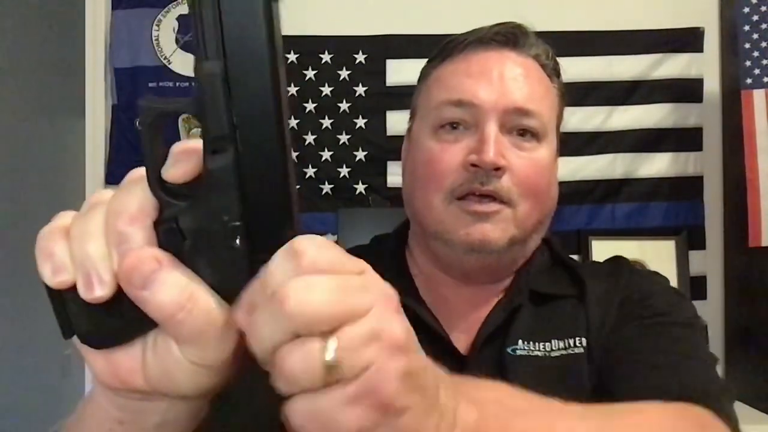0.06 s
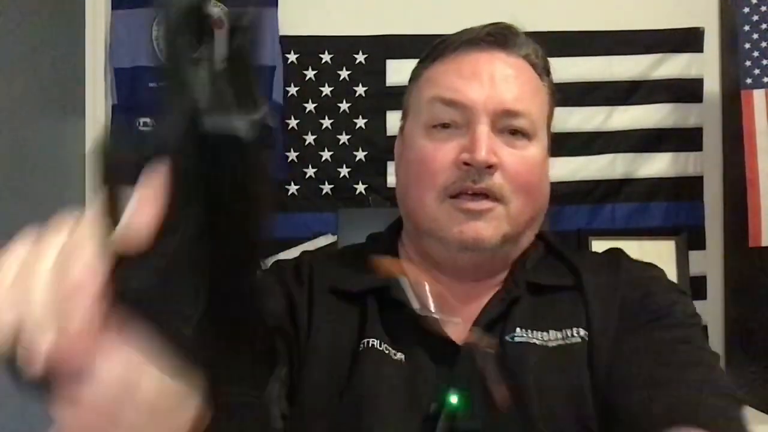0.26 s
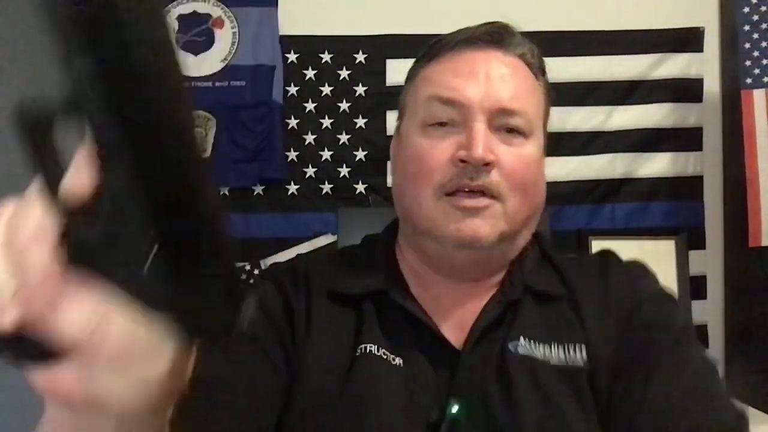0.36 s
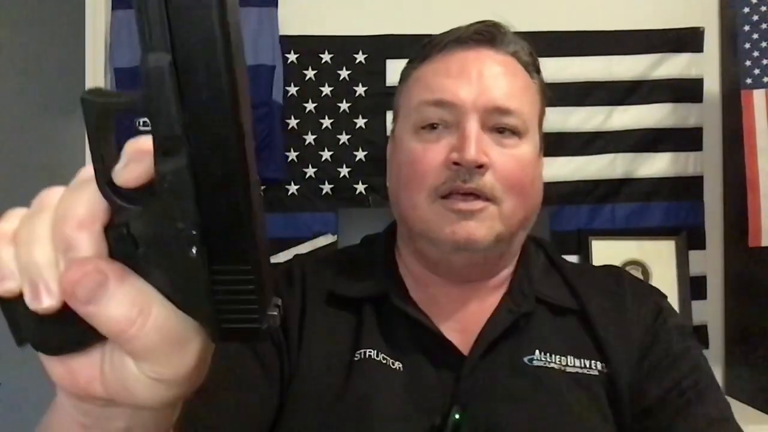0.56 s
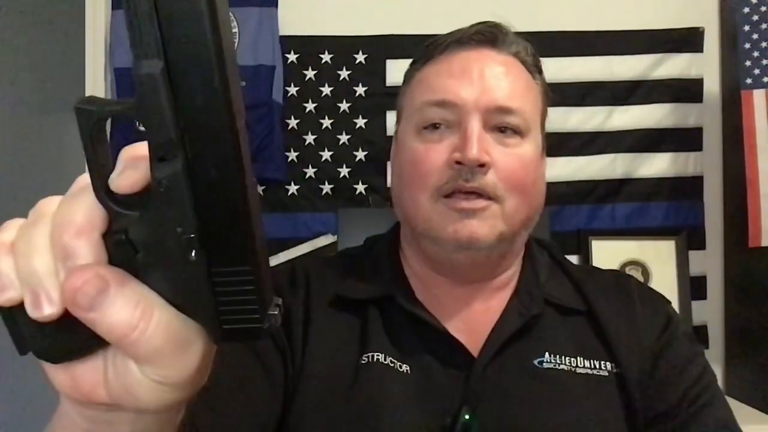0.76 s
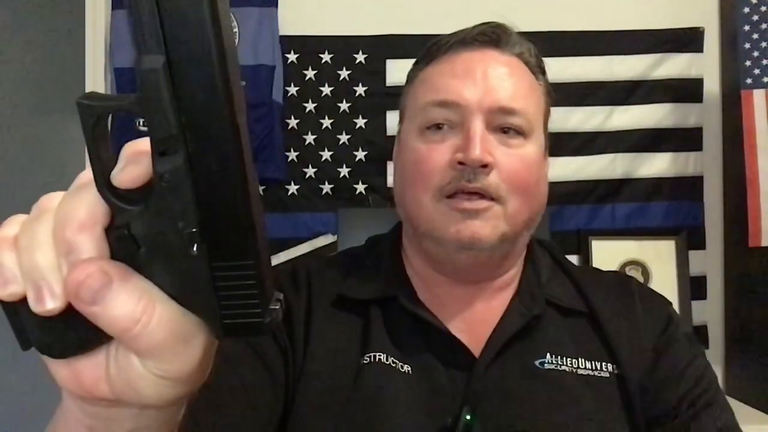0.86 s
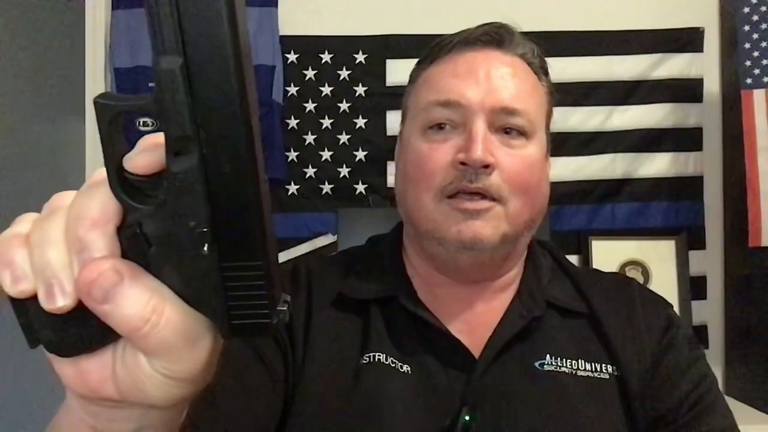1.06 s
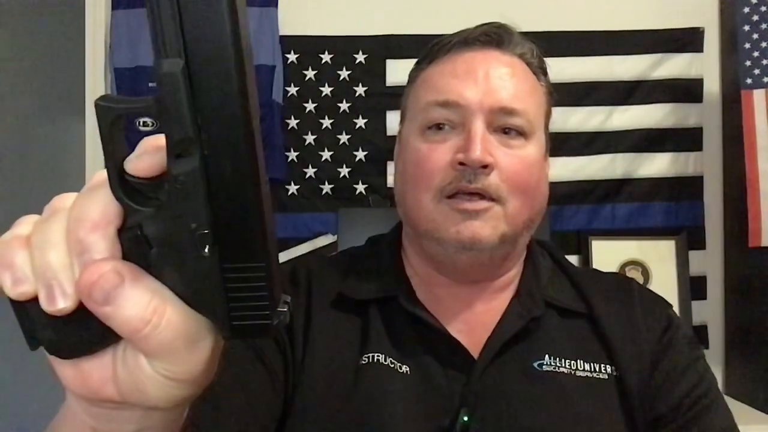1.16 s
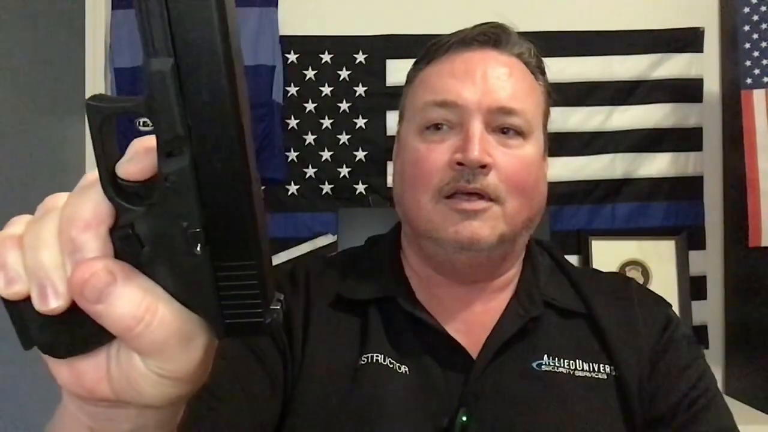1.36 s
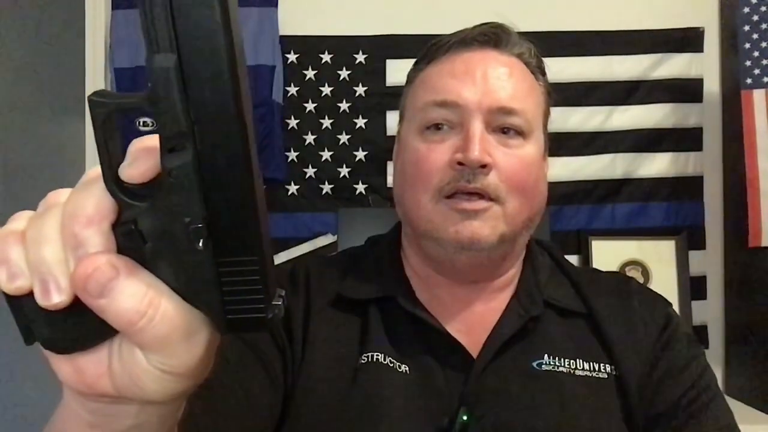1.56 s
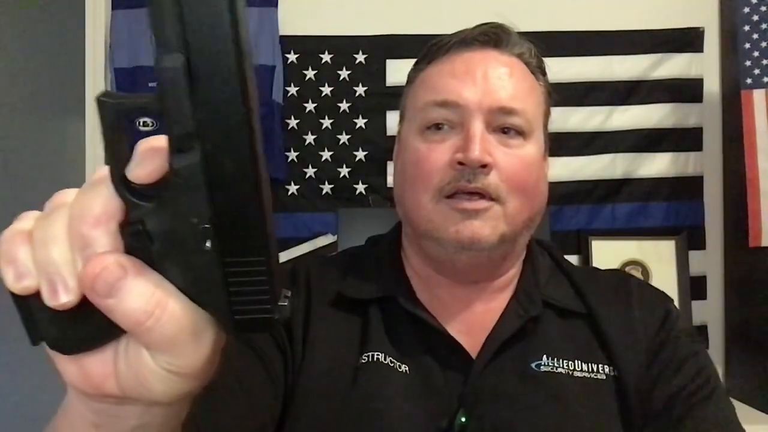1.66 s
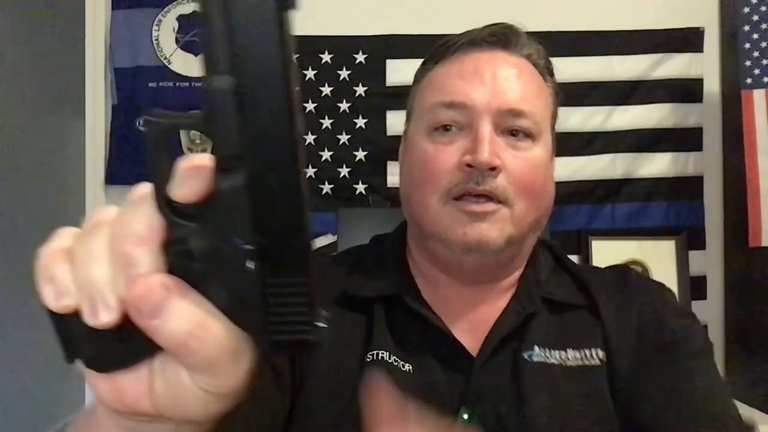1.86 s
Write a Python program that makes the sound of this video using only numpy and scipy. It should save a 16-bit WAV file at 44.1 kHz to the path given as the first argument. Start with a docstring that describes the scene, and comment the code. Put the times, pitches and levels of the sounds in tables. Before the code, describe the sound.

Loud, bright metal clacks of a handgun slide pulled back and released, a soft thud farther off, a dry little tick, then one hard snap with a quick bounce, close and slightly clipped, with short indoor reverberation.

```python
"""Quiet room air comes first; then, close by, a pistol slide chatters back, hits its stop and slams shut.
The ejected dummy round lands with a dull thud; a small catch ticks, then the action snaps and bounces.
Contacts are decaying noise bursts through spectral filters; metal parts add sums of damped sine modes.
The hardest blows add low thumps of falling pitch. A noise-built room response adds reverberation;
the recorder limits the loud blows, rounds their peaks and cuts the top."""
import sys
import numpy as np
from scipy import signal
from scipy.fft import rfft, irfft, next_fast_len
from scipy.io import wavfile
from scipy.ndimage import uniform_filter1d, minimum_filter1d

SR = 44100
rng = np.random.default_rng(int(sys.argv[2]) if len(sys.argv) > 2 else 0)


def store_wav(level_fs):
    """Save 16-bit WAV to argv[1]."""
    pcm = np.round(np.clip(np.atleast_2d(level_fs), -1, 1) * 32767)
    wavfile.write(sys.argv[1], SR, pcm.T.astype(np.int16))


N = 83790  # length [samples]


def undb(db):
    """Amplitude gain is ten to the power of the decibels over twenty."""
    return 10 ** (np.asarray(db) / 20)


def curve(points, hz):
    """Linear interpolation of a table along a logarithmic frequency axis."""
    p = np.array(points, float)
    return np.interp(np.log(hz + 0.0011), np.log(p[:, 0]), p[:, 1])


def fade(t, t60):
    """Exponential decay: the amplitude has fallen by 60 dB after t60 seconds."""
    return np.exp(-np.log(1000) * t / max(t60, 1e-4))


def colour(x, points):
    """Minimum-phase filtering: folding the cepstrum makes a causal filter of unit mean power gain."""
    size = 2 * next_fast_len(N)
    hz = np.arange(size // 2 + 1) * SR / size
    gain = undb(curve(points, hz))
    gain = gain / np.sqrt(np.mean(gain ** 2))
    cepstrum = irfft(np.log(gain))
    # Fold the negative-time half onto the positive-time half.
    cepstrum[1:size // 2] *= 2
    cepstrum[size // 2 + 1:] = 0
    response = np.exp(rfft(cepstrum))
    return irfft(rfft(x, size) * response)[:N]


def add(out, start, sound):
    """Superposition: a sound is summed into the signal from its start time [s]."""
    i = int(max(start, 0) * SR)
    out[i:] += sound[:N - i]


def cracks(hits, points):
    """Contact noise: many tiny collisions act as a decaying random burst with a coloured spectrum."""
    t, out = np.arange(N) / SR, np.zeros(N)
    for start, db, t60 in hits:
        burst = fade(t, t60) * rng.standard_normal(N)
        add(out, start, undb(db) * burst)
    return colour(out, points)


def rings(hits, modes, ring_db):
    """Modal superposition: each contact excites the same damped modes, with fresh random phases."""
    t, out = np.arange(N) / SR, np.zeros(N)
    waves = np.array([undb(db) * fade(t, t60) * np.exp(2j * np.pi * hz * t) for hz, db, t60 in modes])
    for start, db, _ in hits:
        phases = np.exp(2j * np.pi * rng.random(len(modes)))
        add(out, start, undb(db + ring_db) * (phases @ waves).imag)
    # The first mode is the lowest; remove what lies far below it.
    highpass = signal.butter(4, .5 * modes[0][0], "high", fs=SR, output="sos")
    return signal.sosfilt(highpass, out)


def air():
    """Stationary random noise: the quiet air of the room has a fixed spectrum and no events."""
    # Background spectrum: (frequency [Hz], relative level [dB])
    air_colour = [(25, -23.5), (60, -10), (110, -5), (200, -2), (400, -14.5), (650, -17.5), (1400, -23),
                  (3000, -22), (6000, -26.5), (12000, -31.5), (16000, -41)]
    level_db = -68
    return undb(level_db) * colour(rng.standard_normal(N), air_colour)


def room(x):
    """Reverberation as convolution: decaying noise has dense early reflections and a longer tail."""
    # Late decay, shorter in the treble: (frequency [Hz], decay t60 [s])
    room_t60 = [(100, 0.57), (400, 0.635), (1500, .54), (4000, 0.5758), (9000, 0.4758), (15000, 0.3363)]
    # Spectrum of the response: (frequency [Hz], relative level [dB])
    room_colour = [(100, -8), (400, -5), (1000, -6), (2500, -1.5), (5000, 0.5), (10000, 0.5), (15000, -0.5)]
    delay_s, early_t60_s, early_db = .004, 0.22, 6.5  # early level is relative to the tail
    t, hz = np.arange(N) / SR, np.fft.rfftfreq(N, 1 / SR)
    noise, tail = rfft(rng.standard_normal(N)), np.zeros(N)
    for k, (_, t60) in enumerate(room_t60):
        # Overlapping bands whose shares sum to one.
        share = curve([(f, j == k) for j, (f, _) in enumerate(room_t60)], hz)
        decay = fade(t, t60) + undb(early_db) * fade(t, early_t60_s)
        tail += irfft(noise * share, N) * decay
    response = np.zeros(N)
    add(response, delay_s, colour(tail, room_colour))
    response = response / np.sqrt(np.sum(response ** 2))  # unit energy
    return signal.fftconvolve(x, response)[:N]


# Each source below returns two signals: its direct sound and its feed to the room.


def soft_bump():
    """Low-frequency contact noise: a slowly decaying burst makes a faint bump after the tick."""
    # The bump: (time [s], level [dB], decay t60 [s])
    bump = [(1.0955, -49, 0.17)]
    # Its spectrum: (frequency [Hz], relative level [dB])
    bump_colour = [(40, -17), (110, 3.5), (350, -2.5), (550, -17.5), (1200, -38.5), (8000, -59.5)]
    x = cracks(bump, bump_colour)
    return np.array([x, undb(-4.5) * x])


def slack():
    """Weak contact noise: parts taking up slack click faintly before the tick and the snap."""
    # Clicks: (time [s], level [dB], decay t60 [s])
    clicks = [(1.019, -57.5, .012), (1.047, -54.5, .008), (1.383, -47.5, 0.0071), (1.391, -50, 0.025)]
    # Their spectrum: (frequency [Hz], relative level [dB])
    slack_colour = [(200, -27.5), (900, -9), (2100, 2.5), (3500, -8.5), (9000, -9), (15000, -14)]
    x = cracks(clicks, slack_colour)
    return np.array([x, undb(1) * x])


def dummy_round():
    """Distance raises the reverberant share: the round lands farther off, as dull bursts, roomy."""
    # Landing contacts: (time [s], level [dB], decay t60 [s])
    landing = [(.691, -23.5, 0.021), (.7065, -32.5, 0.055), (.724, -38.5, 0.026), (.755, -44, .05)]
    # Their spectrum: (frequency [Hz], relative level [dB])
    landing_colour = [(45, -22.5), (110, -0.5), (300, 1), (550, -4.5), (800, -10), (1050, -21.5),
                      (1600, -17), (2000, -27.5), (2400, -41.5), (6000, -53), (15000, -61)]
    x = cracks(landing, landing_colour)
    return np.array([x, undb(1.0) * x])


def catch():
    """Impact with heavy damping: a small catch gives a dry burst and a brief modal ring."""
    # The tick: (time [s], level [dB], decay t60 [s])
    ticks = [(1.0772, -12.5, 0.0051)]
    # Its contact spectrum: (frequency [Hz], relative level [dB])
    tick_colour = [(100, -52.5), (430, -32.5), (650, -10.5), (1100, -9.5), (1900, -0.5), (2500, -8.5),
                   (3200, 3), (4800, -5), (6600, -6.5), (8000, -1.5), (10000, -7.5), (11000, -0.5),
                   (13000, 2), (15500, -3.5)]
    # Modes of the steel catch: (frequency [Hz], relative level [dB], decay t60 [s])
    catch_modes = [(1830, -31.5, 0.16), (1900, -11, 0.016), (3210, -28, 0.054), (3293, -3, .01),
                   (4660, 2.5, .008), (7960, -4, 0.0056)]
    crack = cracks(ticks, tick_colour)
    ring = rings(ticks, catch_modes, ring_db=-3)
    return np.array([crack + ring, undb(-6) * crack + undb(-13) * ring])


def action():
    """Repeated impact: a spring-driven part snaps home and bounces, each contact exciting its modes."""
    # Snap and bounces: (time [s], level [dB], decay t60 [s])
    snap = [(1.383, -41.5, 0.0068), (1.4135, -8, 0.0079), (1.4153, 2, .009), (1.4205, 1, .009),
            (1.4248, -11, 0.0071), (1.4293, -14.5, 0.013), (1.4345, -16.5, 0.022)]
    # Contact spectrum: (frequency [Hz], relative level [dB])
    snap_colour = [(100, -49), (380, -28), (650, -12.5), (950, -17), (1400, -4.5), (2300, -4), (2900, 0),
                   (3700, -2), (4700, -3.5), (6000, -3.5), (6900, -3), (7600, -5.5), (9700, 6.5),
                   (12000, -6), (15500, -8)]
    # Modes of the steel action: (frequency [Hz], relative level [dB], decay t60 [s])
    action_modes = [(680, -28, .3), (2865, -4, .2), (2990, -6, .3), (3803, -7, .1), (4700, -12, .3),
                    (8744, -5, .12), (9400, -4, .27), (9596, -2, .17), (9799, 0, .17), (10203, -1, .16),
                    (10415, -2, .16)]
    x = cracks(snap, snap_colour) + rings(snap, action_modes, ring_db=-31)
    return np.array([x, undb(-10) * x])


def thumps():
    """Frequency glide: after each hardest blow a low pulse falls in pitch as 1 / (1 + t / halving time)."""
    # Thumps: (time [s], level [dB], starting pitch [Hz], time to halve the pitch [s], decay t60 [s])
    blows = [(.2443, -5.5, 1000, 0.0011, .054), (0.313, -19.5, 300, .0035, 0.1),
             (1.4148, -15, 1016, .0013, 0.088)]
    rise_s = .0015
    t, out = np.arange(N) / SR, np.zeros(N)
    for start, db, hz, halve, t60 in blows:
        turns = hz * halve * np.log1p(t / max(halve, 1e-4))  # phase as the integral of pitch
        envelope = (1 - np.exp(-t / rise_s)) * fade(t, t60)
        add(out, start, undb(db) * envelope * np.sin(2 * np.pi * turns))
    return np.array([out, undb(-40) * out])


def frame():
    """Modal response at low frequency: the frame knocks, short and hollow, as the slide locks."""
    # The locking blow: (time [s], level [dB], decay t60 [s]); the decay is not used here
    lock = [(.3115, -8.5, .01)]
    # Modes of the frame: (frequency [Hz], relative level [dB], decay t60 [s])
    frame_modes = [(185, -3, .05), (495, -2, .022), (798, 2.5, 0.029)]
    x = rings(lock, frame_modes, ring_db=0.5)
    return np.array([x, undb(-23.5) * x])


def slide():
    """Impact excitation: contacts going back, at the stop and at closing excite the slide's steel modes."""
    # Contacts going back (slide and round catching), at the rear stop, and running forward
    # and locking: (time [s], level [dB], decay t60 [s])
    pull_hits, stop_hits, slam_hits = [(.1698, -35, .02), (.1775, -16, .014), (.1807, -13, .009),
                                       (.189, -29, .02), (.205, -11.5, .009), (.2185, -29.5, 0.017),
                                       (.2303, -17, .012), (.233, -7, .014), (.236, -9.5, .012)], [(.244, -9, .012), (.2453, -1.5, 0.02)], [(.293, -13, 0.015), (.295, -8.5, 0.018),
                                                                   (.3005, -17.5, 0.017),
                                                                   (.3033, 0.5, 0.02), (.306, 3, 0.013),
                                                                   (.3095, 1.5, 0.015), (.313, -1, 0.017),
                                                                   (.3183, -12, 0.018),
                                                                   (.331, -19.5, 0.022)]
    # Spectrum of each kind of contact: (frequency [Hz], relative level [dB])
    pull_colour, stop_colour = [(100, -30.5), (400, -20), (1300, -9), (1900, 1.5), (3000, -3), (4200, 3),
                                (5300, -6.5), (9000, -3), (12000, -4), (15500, -11.5)], [(100, -26), (400, -13.5), (700, -6), (1200, -1.5),
                                                     (1900, 4), (3000, -3), (6000, -3), (9300, -0.5),
                                                     (12000, -9), (15500, -10)]
    slam_colour = [(100, -29.5), (260, -8.5), (450, -10.5), (800, -3.5), (1200, -1), (2100, 3), (3200, -1),
                   (4300, 4), (5500, -4), (9500, 3), (12000, -4.5), (14600, -0.5), (15800, -12.5)]
    # Steel modes, slide open and closed: (frequency [Hz], relative level [dB], decay t60 [s])
    open_modes, closed_modes = [(1833, -3, .17), (3130, -9, .08), (4280, -7, .17), (4376, -7, .17),
                                (6900, -10, .08), (8570, -9, .15), (9224, 2, .11), (9300, 0, .11),
                                (13590, -7, .14)], [(1831, -7, .25), (2230, -6, .15), (2835, -11, .3),
                                                    (4200, -6, .2), (4266, -6, .26), (4350, -2, .27),
                                                    (4540, -3, .27), (6973, -5, .1), (8700, -4, .2),
                                                    (9200, -4, .15), (10165, -4, .22), (10510, -8, .25),
                                                    (14600, -2, .07)]
    pull = cracks(pull_hits, pull_colour) + rings(pull_hits, open_modes, ring_db=-26)
    stop = cracks(stop_hits, stop_colour) + rings(stop_hits, open_modes, ring_db=-16)
    slam = cracks(slam_hits, slam_colour) + rings(slam_hits, closed_modes, ring_db=-27)
    feed = undb(-7) * pull + undb(-10.5) * stop + undb(-4.0) * slam
    return np.array([pull + stop + slam, feed])


def scene():
    """Linear superposition: direct sounds, their common reverberation and the air of the room."""
    small_parts = soft_bump() + slack() + dummy_round() + catch()
    direct, feed = small_parts + action() + thumps() + frame() + slide()
    return (direct + room(feed) + air())[None]


def limiter(x):
    """Dynamic range control: gain drops at once at a loud blow, is held, then recovers exponentially."""
    limit_db, sense_s, hold_s, release_s = -6, .002, .17, 0.028
    window, hold = int(sense_s * SR), int(hold_s * SR)
    power = np.abs(uniform_filter1d(x ** 2, window))
    loudness_db = 10 * np.log10(power + 1e-12)
    gain_db = np.minimum(limit_db - loudness_db, 0)
    # The shifted window holds the lowest gain of the time just past.
    held = minimum_filter1d(gain_db, hold, origin=(hold - 1) // 2)
    pole = np.exp(-1 / (release_s * SR))
    recovering = signal.lfilter([1 - pole], [1, -pole], held)
    return x * undb(np.minimum(held, recovering))


def record(dry):
    """Saturation and band limiting: limited blows are rounded by tanh, then low-pass filtered."""
    ceiling, top_hz = .86, 15700  # ceiling [full scale], before the low-pass
    rounded = ceiling * np.tanh(limiter(dry) / ceiling)
    lowpass = signal.ellip(10, .2, 90, top_hz, fs=SR, output="sos")
    return signal.sosfilt(lowpass, rounded)


dry = scene()
out = record(dry)
store_wav(out)
```